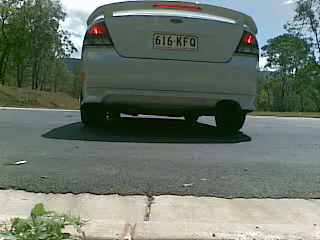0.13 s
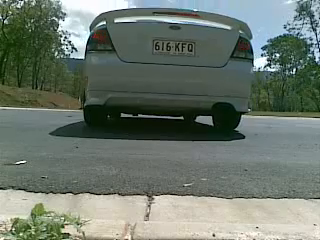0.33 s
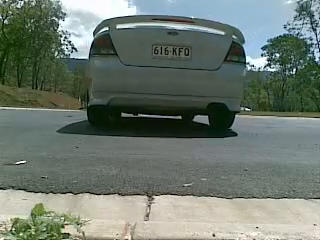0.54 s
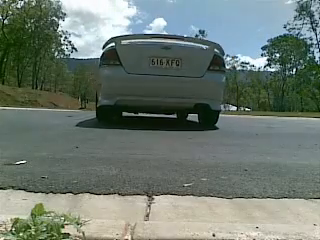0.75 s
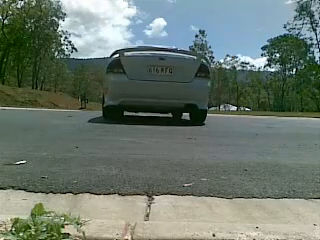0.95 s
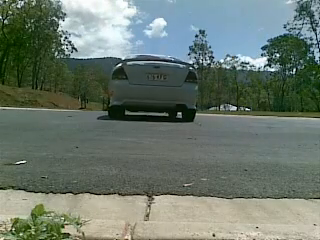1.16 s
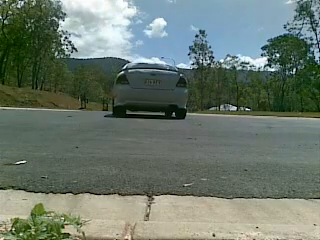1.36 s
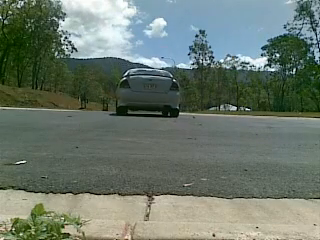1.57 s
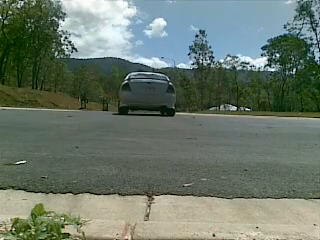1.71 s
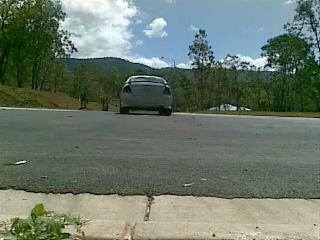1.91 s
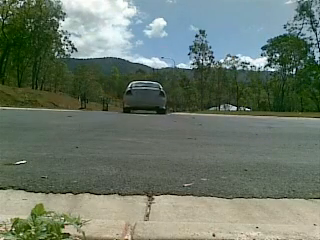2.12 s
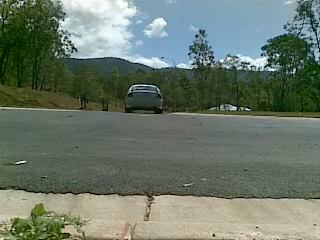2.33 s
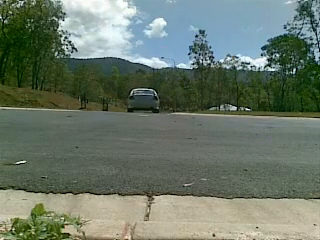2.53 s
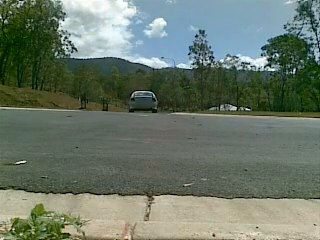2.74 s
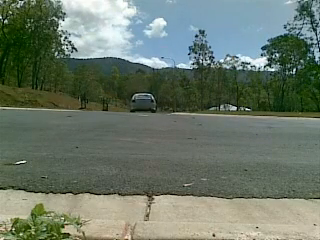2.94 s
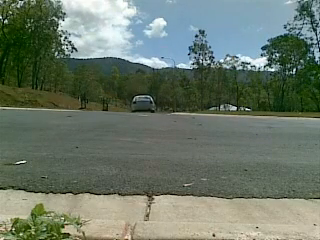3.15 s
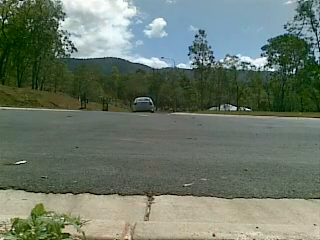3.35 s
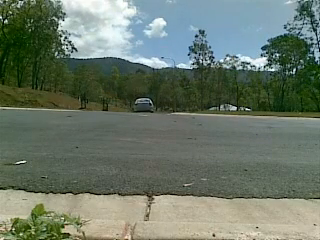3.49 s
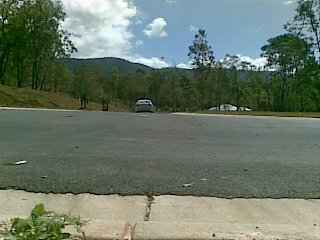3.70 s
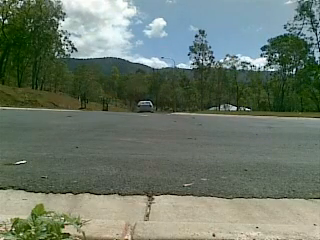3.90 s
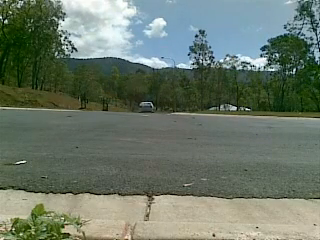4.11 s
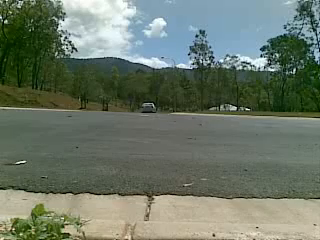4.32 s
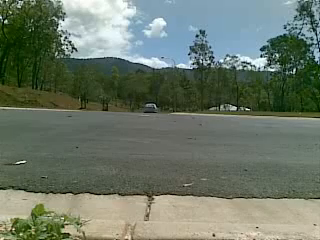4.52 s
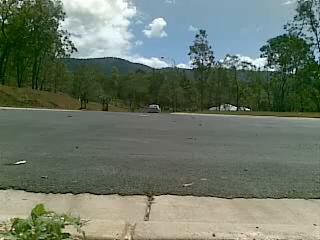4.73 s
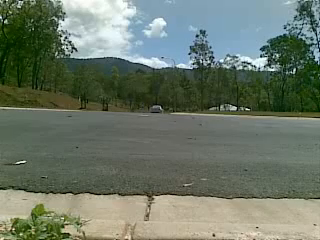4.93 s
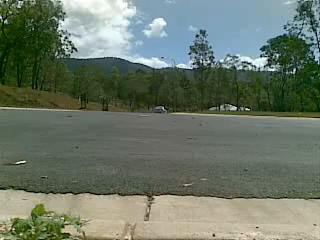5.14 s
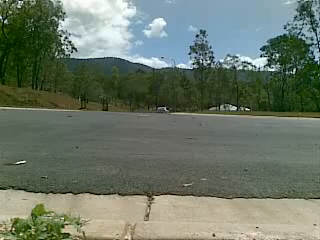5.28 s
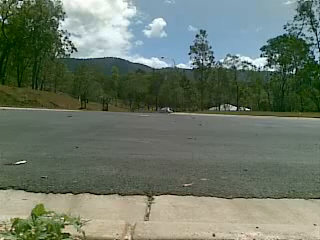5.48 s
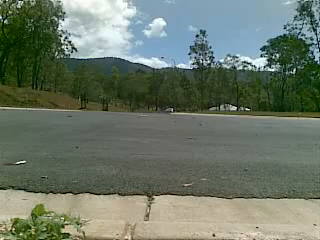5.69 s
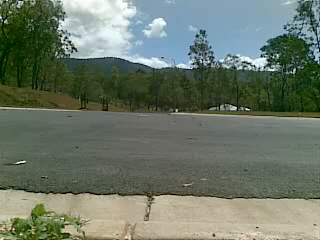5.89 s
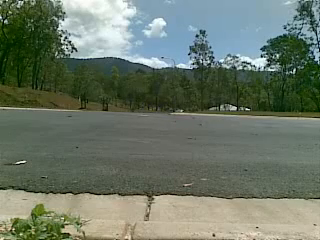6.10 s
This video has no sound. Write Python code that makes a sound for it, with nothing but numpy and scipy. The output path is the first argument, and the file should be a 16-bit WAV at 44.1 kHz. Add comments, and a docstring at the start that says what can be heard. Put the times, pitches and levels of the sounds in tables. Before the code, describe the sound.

A six-cylinder car launches from idle on an open road, its tailpipe close to a microphone at the kerb. The exhaust pops, cracks and booms, with a hiss of gas. The engine chugs, then climbs steadily in pitch and turns raspy as it moves away. After about four seconds the throttle closes, leaving faint tyre noise and light wind bumping the microphone.

```python
"""At the kerb, a six-cylinder car pulls away hard from idle, its tailpipe close by.
Each firing booms and barks through the exhaust; the first ones pop and crack, and gas hisses out.
The engine chugs, sings, then rasps as it climbs, until the throttle closes.
The car rolls on far away, tyres roaring, while light wind bumps the microphone."""
import sys
import numpy as np
from scipy import signal
from scipy.fft import rfft, irfft, next_fast_len
from scipy.io import wavfile
from scipy.ndimage import uniform_filter1d, map_coordinates

SR = 44100
rng = np.random.default_rng(int(sys.argv[2]) if len(sys.argv) > 2 else 0)


def transcribe(signal):
    """Save signal, clipped to [-1, 1], as a 16-bit WAV file at the path in sys.argv[1]."""
    frames = np.atleast_2d(signal).T
    limited = np.clip(frames, -1, 1)
    pcm = np.round(limited * 32767).astype(np.int16)
    wavfile.write(sys.argv[1], SR, pcm)


N = 271215


def amp(db):
    """dB to gain."""
    return 10 ** (np.asarray(db) / 20)


def unit(x):
    """Scale to rms 1."""
    return x / np.sqrt(np.mean(x ** 2) + 1e-20)


def clock():
    """Sample times, s."""
    return np.arange(N) / SR


def ramp(start_s, length_s):
    """Linear rise, 0 to 1."""
    return np.clip((clock() - start_s) / length_s, 0, 1)


def since(start_s):
    """Seconds since start, 0 before."""
    return np.maximum(clock() - start_s, 0)


def swell(centre_s, half_width_s):
    """Gaussian envelope, peak 1."""
    return np.exp(-((clock() - centre_s) / half_width_s) ** 2)


def curve(rows):
    """(time_s, value) rows, interpolated per sample."""
    return np.interp(clock(), *np.transpose(rows))


def wobble(rate_hz):
    """Smooth random curve, rate_hz knots a second."""
    knots = rng.standard_normal(int(N * rate_hz / SR) + 4)
    return map_coordinates(knots, [clock() * rate_hz], mode="nearest")


def filtered(x, response):
    """Apply a complex frequency response."""
    size = 2 * next_fast_len(N // 2 + SR // 4)
    return irfft(rfft(x, size) * response(np.fft.rfftfreq(size, 1 / SR)), size)[:N]


def coloured(x, points):
    """Minimum-phase filter through (freq_hz, gain_db) points."""
    def response(hz):
        freq_hz, gain_db = np.transpose(points)
        cepstrum = irfft(np.log(amp(np.interp(np.log(hz + 1), np.log(freq_hz), gain_db))))
        half = len(cepstrum) // 2
        cepstrum[1:half] *= 2
        cepstrum[half + 1:] = 0
        return np.exp(rfft(cepstrum))
    return filtered(x, response)


def noise(points):
    """Noise of rms 1, shaped by (freq_hz, gain_db) points."""
    return unit(coloured(rng.standard_normal(N), points))


def steady(x, span_s):
    """Hold the running rms at 1."""
    size = int(span_s * SR)
    power = uniform_filter1d(uniform_filter1d(x * x, size), size)
    return x / np.sqrt(np.abs(power) + 1e-20)


def impulses(times_s, sizes):
    """Impulses, each split between adjacent samples."""
    at = np.clip(np.asarray(times_s) * SR, 0, N - 2)
    i = at.astype(int)
    return np.bincount(i, sizes * (1 - at + i), N) + np.bincount(i + 1, sizes * (at - i), N)


def decays(times_s, sizes, decay_s):
    """An exponential tail from each time."""
    return signal.lfilter([1], [1, -np.exp(-1 / (decay_s * SR))], impulses(times_s, sizes))


OPEN_S, CLOSE_S, CLOSE_DB_PER_S = 0.032, 4.315, 85  # throttle
START_M, ACCELERATION_M_PER_S2 = 2.91, 4.05
STRAIN_FROM_HZ, STRAIN_FULL_HZ = 182, 222  # firing rate
FIRST_POP_S, BLAST_PEAK_S = .081, 0.22


def idling():
    """1 at idle, 0 with the throttle open."""
    return 1 - ramp(OPEN_S, 0.16)


def picked_up():
    """0-1: the engine pulls clear of low revs."""
    return ramp(start_s=1, length_s=.75)


def lugging():
    """0-1: heavy load from clutch bite to pick-up."""
    return ramp(start_s=.28, length_s=.35) * (1 - picked_up())


def travelled_m():
    """Distance from rest at constant acceleration."""
    return .5 * ACCELERATION_M_PER_S2 * clock() ** 2


def distance_loss_db():
    """Spherical spreading loss against the starting distance."""
    return 20 * np.log10(1 + travelled_m() / START_M)


# time_s, firing_hz
FIRING_RATE = [(0.08, 31.2), (0.18, 43.3), (0.34, 76.6), (0.52, 91.3), (0.75, 101.1), (1.36, 108.9),
               (1.78, 119.1), (2.23, 134.4), (3.74, 198.0), (4.09, 213.5), (4.35, 223.4), (4.55, 203.4)]


def firings():
    """Firing rate and running count; six firings per engine cycle."""
    firing_hz = curve(FIRING_RATE)
    return firing_hz, np.cumsum(firing_hz) / SR + .47


# pitch_hz, level_db
PIPE_BOOM = [(30, -44), (38, -23), (55, -16.5), (76, -25.5), (111, -29.5), (148, -19.5), (176, -21),
             (185, -25.5), (194, -21.5), (222, -22), (270, -36.5)]


def drone(firing_hz, count):
    """Low notes swell through the pipe's resonances; unequal manifold halves add half orders."""
    boom = lambda pitch_hz: amp(np.interp(pitch_hz, *np.transpose(PIPE_BOOM)))
    idle_db = -12.5 * (1 - ramp(OPEN_S, 0.037))
    level_db = idle_db - distance_loss_db() - CLOSE_DB_PER_S * since(CLOSE_S)
    phase = 2 * np.pi * count
    note = amp(0.73 * wobble(40)) * np.cos(phase)
    # octave fades once the clutch takes the load
    octave = amp(-8 - 19.6 * since(0.31) + 0.46 * wobble(36)) * -np.cos(2 * phase)
    throb = 1 + 0.71 * np.cos(phase / 6)  # loudest cylinder's push
    half_orders = 0.3 * lugging() * np.cos(phase / 2 + 1.3) + 0.53 * throb * np.cos(3 * phase / 2)
    strain = np.clip((firing_hz - STRAIN_FROM_HZ) / (STRAIN_FULL_HZ - STRAIN_FROM_HZ), 0, 1)
    imbalance = amp(-17.5) + amp(-4) * lugging() + amp(-15) * strain ** 2
    beat = imbalance * amp(wobble(17)) * half_orders
    low_notes = boom(firing_hz) * (note + beat + growl(firing_hz, phase))
    return np.sqrt(2) * amp(level_db) * (low_notes + boom(2 * firing_hz) * octave)


# freq_hz, gain_db
RUMBLE_SPECTRUM = [(12, -18), (32, -7), (55, -3.5), (90, -8), (150, -12.5), (250, -24), (500, -44.5),
                   (1500, -68.5)]
# centre_s, level_db, pitch_hz, half_width_s
EDDIES = [(5.186, -42, 66.7, 0.018), (5.271, -36.5, 62, 0.016), (5.429, -38.5, 67, 0.017),
          (5.848, -40, 98.5, 0.016), (5.95, -38.5, 60, 0.019), (6.025, -37.5, 63.6, 0.017)]


def wind():
    """Launch blast, wake and breeze rumble; short eddies bump the microphone."""
    blast = amp(-39 - 10 * idling() - 35 * since(BLAST_PEAK_S))
    wake = amp(-48 - 0.45 * distance_loss_db() - CLOSE_DB_PER_S * since(CLOSE_S))
    breeze = amp(-55 + 2 * ramp(4.85, 0.12))
    level = np.sqrt(blast ** 2 + wake ** 2 + breeze ** 2)
    rumble = level * amp(1.7 * wobble(10)) * noise(RUMBLE_SPECTRUM)
    bumps = sum(amp(db) * swell(centre_s, half_width_s) * np.cos(2 * np.pi * hz * (clock() - centre_s))
                for centre_s, db, hz, half_width_s in EDDIES)
    return rumble + bumps * (1 + 0.31 * wobble(200))


# freq_hz, gain_db
ROAR_SPECTRUM = [(90, -16), (170, -14.5), (230, -17.5), (320, -4.5), (400, -8), (470, -1), (560, -1),
                 (690, -7), (860, -2.5), (1020, -9), (1150, -8.5), (1350, -14.5), (1700, -14.5),
                 (3000, -43.5)]
SIZZLE_SPECTRUM = [(1000, -12.5), (1500, -5), (1950, 3), (2500, -2.5), (3200, -6.5), (3900, -12.5),
                   (8000, -27.5)]


def tyres(db_per_doubling=6.5):
    """Roar and sizzle grow with speed, then fade with distance, sizzle first."""
    speed_share = np.clip(clock() / CLOSE_S, .25, 1)
    level_db = db_per_doubling * np.log2(speed_share) + 1.1 * wobble(7.3)
    roar = amp(-61 - 7.3 * since(5.14)) * noise(ROAR_SPECTRUM)
    sizzle = amp(-70 - 8.1 * since(4.96)) * speed_share * noise(SIZZLE_SPECTRUM)
    return amp(level_db) * (roar + sizzle)


def background(level_db=-78):
    """Faint, even hiss."""
    return amp(level_db) * noise([(100, 9.5), (2000, 0.5), (6000, 6.5), (14000, -6.0)])


# freq_hz, gain_db
PIPE_RESPONSE = [(100, -18), (160, -4), (210, 3), (265, -1), (320, 3), (365, 1.5), (405, -0.5), (450, -2.5),
                 (505, 0.5), (550, 0), (590, 2), (630, -0.5), (680, 0), (760, -8), (880, -18), (1100, -23),
                 (1500, -38), (4000, -58.5)]


def pipe(x, edge_db, corner_hz=620):
    """Exhaust resonances; abrupt pulses carry edge_db more above the corner."""
    ringing = coloured(x, PIPE_RESPONSE)
    dull = filtered(ringing, lambda hz: 1 / (1 + (hz / corner_hz) ** 8))
    return dull + amp(edge_db) * (ringing - dull)


# time_s, level_db
BARK_LEVEL = [(0.39, -40.5), (0.45, -41), (0.62, -42.5), (0.8, -45), (1.2, -49), (1.71, -45), (2.16, -48.5),
              (2.56, -43.5), (2.98, -47.5), (3.36, -44.5), (3.43, -47.5), (3.8, -46.5), (4.04, -46.5),
              (4.34, -46), (4.49, -62.5), (4.55, -61.5)]
# in firing order: level_db, late_periods
CYLINDER_PULSES = [(-1, 0), (-2.5, .045), (-5, .02), (-1.5, .055), (-2, .005), (0, .06)]


def bark(firing_hz, count, break_up_hz=7):
    """One blow-down pulse per firing, trailing a turbulent puff, rings through the exhaust."""
    launch = swell(0, 1)
    rasp = np.clip((firing_hz - STRAIN_FROM_HZ) / break_up_hz, 0, 1)
    firing = np.arange(int(count[-1]))
    at = np.searchsorted(count, firing)
    cylinder = firing % 6
    size_db, late_periods = np.transpose(CYLINDER_PULSES)[:, cylinder]
    late_periods = late_periods + .055 * rasp[at] * (firing % 2)  # alternate firings lag in the rasp
    scatter = .05 + .06 * launch + .09 * rasp
    time_jitter, size_jitter = scatter[at] * rng.standard_normal((len(firing), 2)).T
    times_s = np.interp(firing + 0.3147 + late_periods + 0.19 * time_jitter, count, clock())
    # last cylinder leads under load: one chug per cycle
    chug_db = (7.3 * lugging() + 3 * rasp)[at] * (cylinder == 5)
    pulses = impulses(times_s, amp(size_db + chug_db) * np.exp(size_jitter))
    puffs = decays(times_s, amp(size_db + .5 * chug_db), decay_s=0.022) * rng.standard_normal(N)
    edge_db = 1 - 0.61 * distance_loss_db() + 10 * rasp
    clean, rough = [steady(pipe(x, edge_db), span_s=.12) for x in (-pulses, puffs)]
    high_revs_oct = np.maximum(np.log2(firing_hz / 135), 0)
    turbulent_share = np.clip(.025 + .2 * high_revs_oct + .4 * launch + .2 * rasp, 0, 1)
    # held down until it takes over from the pops
    early_cut_db = 28 * idling() + 10 * (clock() < OPEN_S) + 2.5 * (1 - ramp(.33, .06))
    level = amp(curve(BARK_LEVEL) + 0.48 - early_cut_db)
    return level * (np.sqrt(1 - turbulent_share) * clean + np.sqrt(turbulent_share) * rough)


# time_s, level_db
GAS_LEVEL = [(0.25, -57.5), (0.31, -58), (0.45, -54), (0.64, -54), (0.72, -55), (1.12, -62), (1.26, -65.5),
             (1.73, -63.5), (2.19, -73.5), (3.43, -69), (3.65, -64), (4.27, -61.5), (4.5, -61.5)]
# freq_hz, gain_db
RUSH_SPECTRUM = [(650, -30), (900, -6.5), (1150, -5.5), (1650, -3.5), (2100, 0.5), (2500, -2.5), (3200, -7),
                 (3700, -17), (5000, -16), (7000, -41.5)]
HISS_SPECTRUM = [(2800, -10.5), (3800, -9.5), (4900, -0.5), (6000, -1.5), (7200, 3), (8400, -1),
                 (10200, -2.5), (12000, -28), (14000, -26)]
FIZZ_SPECTRUM = [(9000, -14.5), (11500, 6), (14000, -3)]
# pitch_hz, width_hz, gain_db
WHISTLE_MODES = [(1120, 50, -19), (1340, 40, -10), (1520, 50, -16), (1800, 50, -14), (2090, 90, -3),
                 (2450, 110, -11)]


def gas_jet(count, hiss_loss_db_per_m=0.16):
    """Gas rushes from the pipe, pulsing with the firings, and whistles briefly.
    A high fizz tops the hiss at first and fades over about two seconds."""
    early_cut_db = 14 * idling() + 7 * (clock() < FIRST_POP_S)
    rush_db = curve(GAS_LEVEL) - early_cut_db - 45 * since(CLOSE_S)
    hiss_db = rush_db - 7.5 - hiss_loss_db_per_m * travelled_m() - 12 * (1 - ramp(FIRST_POP_S, .01))
    surge = 1 + 0.079 * np.cos(2 * np.pi * (count - .5)) + 0.066 * np.cos(np.pi * count / 3)
    rush = amp(rush_db + 0.83 * wobble(24.83)) * noise(RUSH_SPECTRUM)
    hiss = amp(hiss_db + 1.18 * wobble(22.14)) * noise(HISS_SPECTRUM)
    fizz = amp(hiss_db - 3.5 + 1.3 * wobble(24)) * swell(0, 1.94) * noise(FIZZ_SPECTRUM)
    modes = lambda f: sum(amp(db) * 1j * f * width_hz / (hz * hz - f * f + 1j * f * width_hz)
                          for hz, width_hz, db in WHISTLE_MODES)
    whistle = amp(rush_db - 4) * swell(.76, 0.26) * unit(filtered(rng.standard_normal(N), modes))
    return surge * (rush + hiss + fizz) + whistle


def sputter(firing_hz, count):
    """The first pop frees a spit of gas; the blast's rasp then swells with each firing's puff."""
    from_firing_s = (count - np.round(count)) / firing_hz - .001
    blast_db = -45.5 - 115 * np.maximum(BLAST_PEAK_S - clock(), 0) - 240 * since(BLAST_PEAK_S)
    puffs = amp(blast_db) * (.35 + .65 * np.exp(-(from_firing_s / 0.004) ** 2))
    first_spit = amp(-53 - 600 * since(FIRST_POP_S))
    rasp = noise([(500, -32), (2000, 16), (3600, -1), (5000, 5), (9000, 4), (11000, 0), (13000, 4)])
    return ramp(FIRST_POP_S - .004, .006) ** 2 * (puffs + first_spit) * rasp


# start_s, level_db
POP_CRACKS = [(0.084, -42), (0.1875, -32), (0.2085, -36)]


def cracks(decay_db_per_s=1300):
    """Brief, bright cracks on three pops of the blast."""
    bursts = sum(amp(db - decay_db_per_s * since(start_s)) * ramp(start_s, .001)
                 for start_s, db in POP_CRACKS)
    crackle = noise([(300, -20), (600, 4), (900, -2), (1300, -9), (2600, -10), (3800, -24), (9000, -35)])
    return bursts * steady(crackle, span_s=.01)


# start_s, peak_db
HARD_FIRINGS = [(0.0855, -34), (0.1675, -33), (0.1885, -24.5), (0.2085, -32), (0.2285, -33), (0.2515, -29),
                (0.268, -29), (0.299, -23), (0.3265, -27), (0.3538, -23.5), (0.4045, -35), (0.4955, -35),
                (0.596, -33)]


def pops(edge_db=0.5, puff_db=-18.5):
    """The first hard firings thump through the pipe, each trailing a turbulent puff."""
    start_s, peak_db = np.transpose(HARD_FIRINGS)
    pipe_peak = np.abs(pipe(impulses([1], np.ones(1)), edge_db)).max()
    thumps = pipe(impulses(start_s, -amp(peak_db)), edge_db) / pipe_peak
    trails = decays(start_s, amp(peak_db + puff_db), decay_s=.011)
    return thumps + trails * unit(pipe(rng.standard_normal(N), edge_db))


# centre_s, level_db, pitch_hz, half_width_s
WHISTLE_FLARES = [(0.685, -53, 2090, .025), (0.75, -57, 2080, .04), (0.847, -56, 2550, .012),
                  (0.935, -60, 2350, .018), (1.035, -58, 2130, .014)]


def whistle_flares(half_band_hz=90):
    """The tailpipe's whistle flares briefly in narrow noise bands."""
    def band(hz):
        return unit(filtered(rng.standard_normal(N), lambda f: 1 / (1 + ((f - hz) / half_band_hz) ** 2)))
    return sum(amp(db) * swell(centre_s, half_width_s) * band(hz)
               for centre_s, db, hz, half_width_s in WHISTLE_FLARES)


def roadside_echo(x, far_db=-11, delay_s=.012, drift_s=.0006):
    """A drifting reflection grows with distance; overtones swell and fade in turn."""
    gain = amp(far_db) * travelled_m() / (travelled_m() + START_M)
    echo = np.interp(clock() - delay_s - drift_s * wobble(4), clock(), x)
    return (x + gain * echo) / np.sqrt(1 + gain ** 2)


def growl(firing_hz, phase, db_per_doubling=33):
    """Unequal cylinders growl below the firing note after pick-up, more as the revs climb."""
    climbing = amp(-4 + db_per_doubling * np.log2(firing_hz / firing_hz.max()))
    cruising = amp(-18) * picked_up()
    half = np.maximum(climbing, cruising) * np.cos(phase / 2 + 2.0)
    thirds = climbing * (.4 * np.cos(phase / 3) + 0.5 * np.cos(2 * phase / 3))
    return amp(1.2 * wobble(7.8)) * (half + thirds)


def tick(start_s=1.289, level_db=-55.5, pitch_hz=3800, t60_s=0.04):
    """A tiny bright tick, perhaps grit thrown by a tyre."""
    ring = noise([(1000, -12), (pitch_hz * 0.9, -12), (pitch_hz, 0), (pitch_hz * 1.1, -10),
                  (6000, -22), (12000, -45)])
    return (clock() > start_s) * amp(level_db - 60 * since(start_s) / t60_s) * ring


# firing_multiple, from_firing_hz, gain_db
HIGH_REV_OVERTONES = [(1.5, 190, -13.5), (2, 150, -10), (2.5, 135, -14)]
# firing_multiple, gain_db
RESONANT_ORDERS = [(2.5, -8), (3.5, -10.5)]


def sing(firing_hz, count, broad_hz=475, narrow_hz=545, fade_in_hz=22):
    """Overtones swell as they cross two pipe resonances; others come in at high revs."""
    in_resonance = np.exp(-((3 * firing_hz - broad_hz) / 80) ** 4)
    third = amp(-12) * in_resonance * -np.cos(6 * np.pi * (count - .35))
    partial = lambda order: -np.cos(2 * np.pi * order * (count - .37))
    fade_in = lambda from_hz: np.clip((firing_hz - from_hz) / fade_in_hz, 0, 1)
    overtones = sum(amp(db + 1.5 * wobble(20)) * fade_in(from_hz) * partial(order)
                    for order, from_hz, db in HIGH_REV_OVERTONES)
    ringing = sum(amp(db) * np.exp(-((order * firing_hz - narrow_hz) / 32) ** 2) * partial(order)
                  for order, db in RESONANT_ORDERS)
    return amp(curve(BARK_LEVEL)) * coloured(third + overtones + ringing, PIPE_RESPONSE)


# pitch_hz, level_db, centre_s, half_width_s
COASTING_HUMS = [(450, -64.5, 5.75, .45), (556, -67.5, 5.55, .2)]


def hum(sag_from_s=5.72, sag_hz_per_s=95):
    """Two fuzzy, wavering tones from the far car swell and sag in pitch."""
    tones = 0
    for hz, db, centre_s, half_width_s in COASTING_HUMS:
        pitch_hz = hz - sag_hz_per_s * since(sag_from_s) + 7 * wobble(9)
        phase = 2 * np.pi * np.cumsum(pitch_hz) / SR
        level = amp(db + 1.5 * wobble(7)) / np.sqrt(1 + ((clock() - centre_s) / half_width_s) ** 2)
        tones += level * ((.7 + .8 * wobble(45)) * np.cos(phase) + .8 * wobble(45) * np.sin(phase))
    return ramp(CLOSE_S, 0.28) * tones


# centre_s, level_db, half_width_s
COASTING_THUDS = [(4.73, -53, .05), (4.97, -55, .06), (5.013, -49, .014)]
# freq_hz, gain_db
THUD_SPECTRUM = [(50, -4), (140, 0), (280, -11), (550, -22), (900, -38), (3000, -60)]


def thuds():
    """Soft low thuds swell out of the rumble as the car coasts."""
    level = sum(amp(db) * swell(centre_s, half_width_s) for centre_s, db, half_width_s in COASTING_THUDS)
    return level * steady(noise(THUD_SPECTRUM), span_s=.02)


def scene():
    """Exhaust, tyres and air, in mono."""
    firing_hz, count = firings()
    engine = drone(firing_hz, count) + roadside_echo(bark(firing_hz, count) + sing(firing_hz, count))
    engine *= 1 - ramp(4.5, .25)  # throttle closed: sinks below the tyres
    exhaust = engine + pops() + cracks() + gas_jet(count) + whistle_flares() + sputter(firing_hz, count)
    return (exhaust + background() + tyres() + hum() + wind() + thuds() + tick())[None]


def record(dry):
    """Brick-wall low-pass."""
    return filtered(dry[0], lambda hz: hz < 14250)[None]


dry = scene()
out = record(dry)
transcribe(out)
```